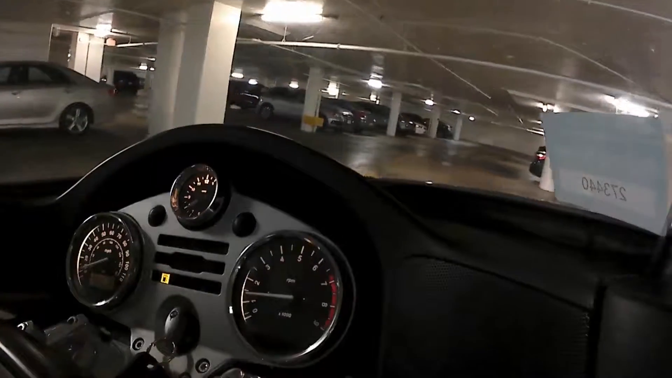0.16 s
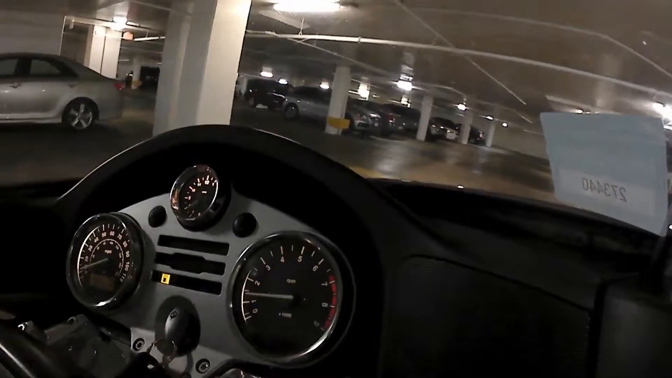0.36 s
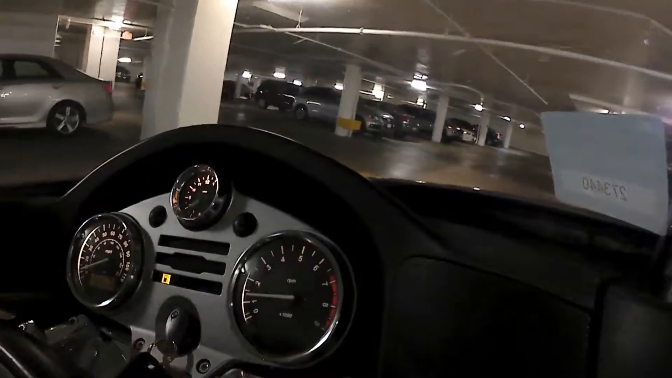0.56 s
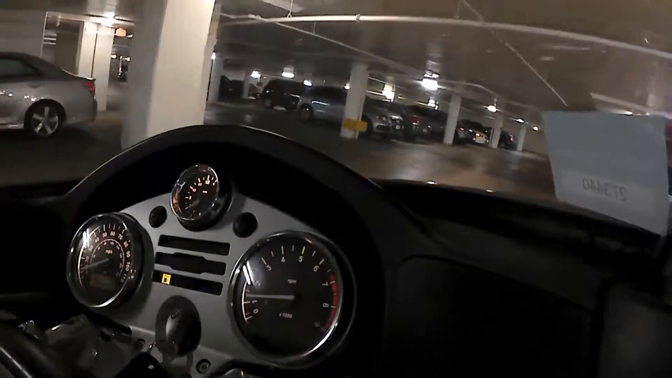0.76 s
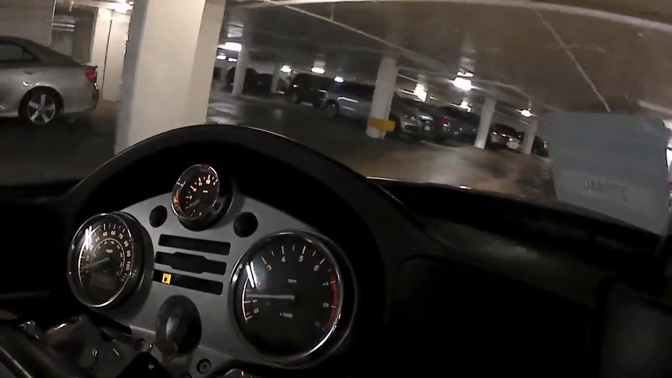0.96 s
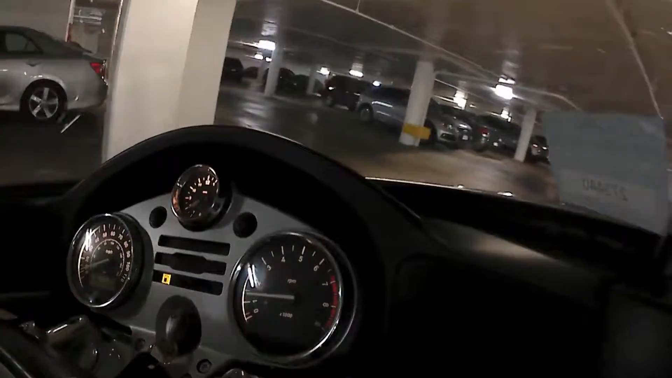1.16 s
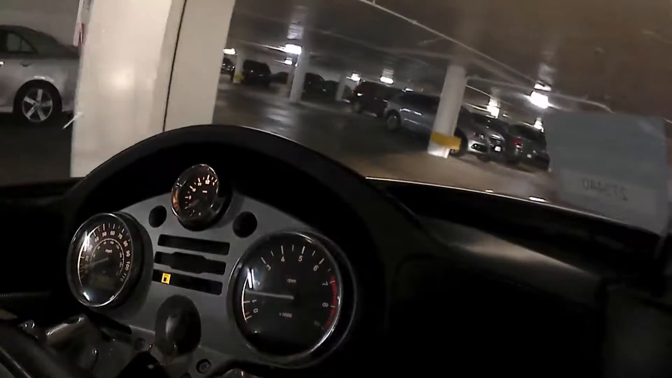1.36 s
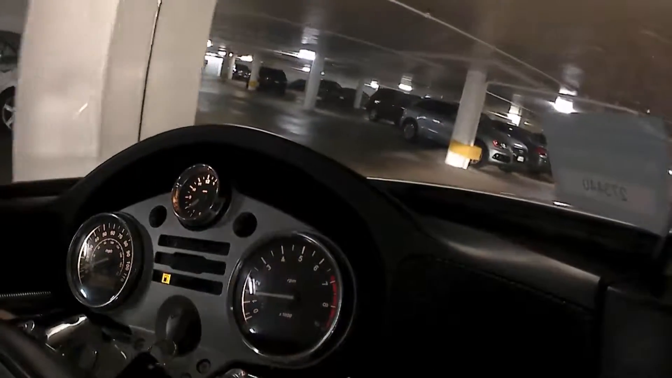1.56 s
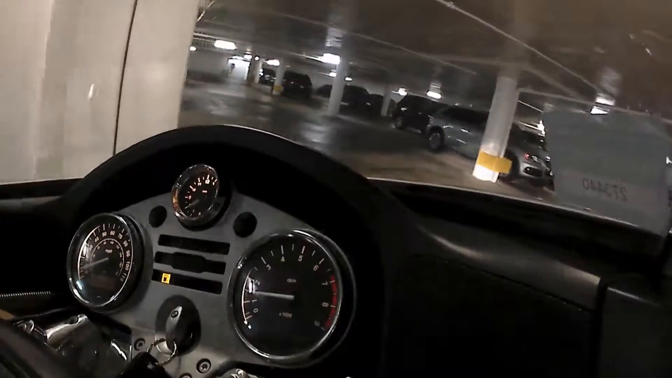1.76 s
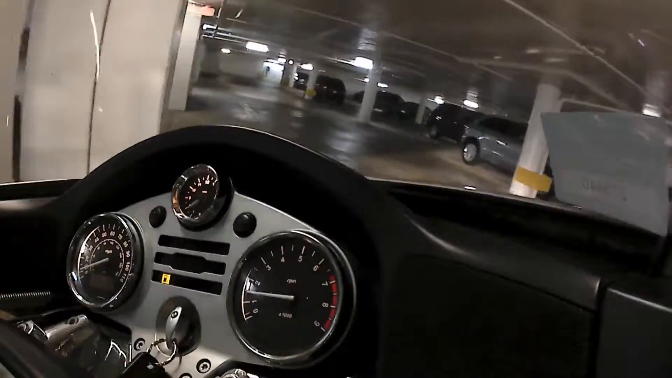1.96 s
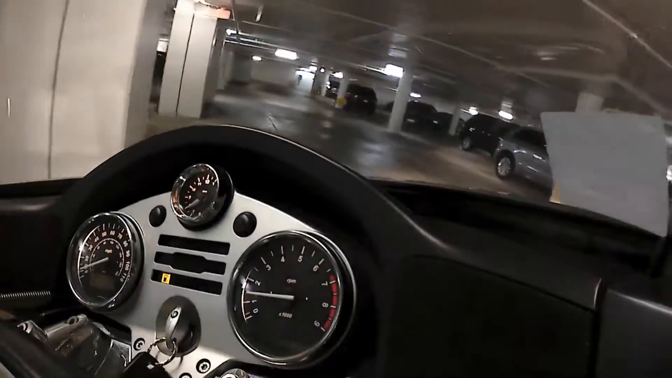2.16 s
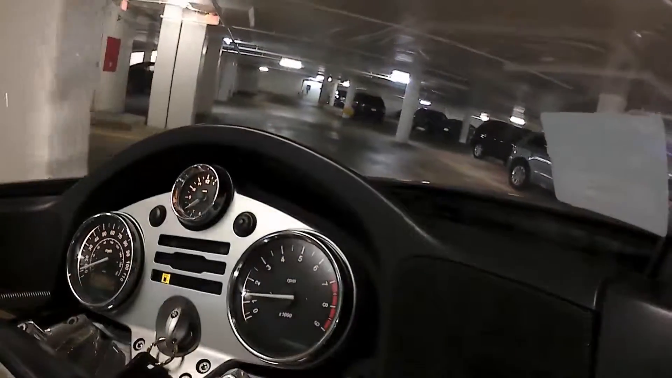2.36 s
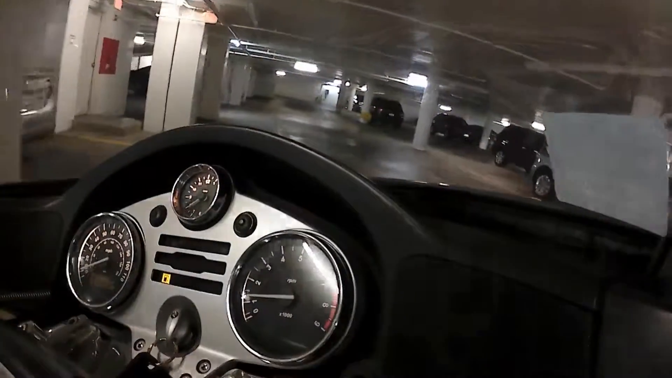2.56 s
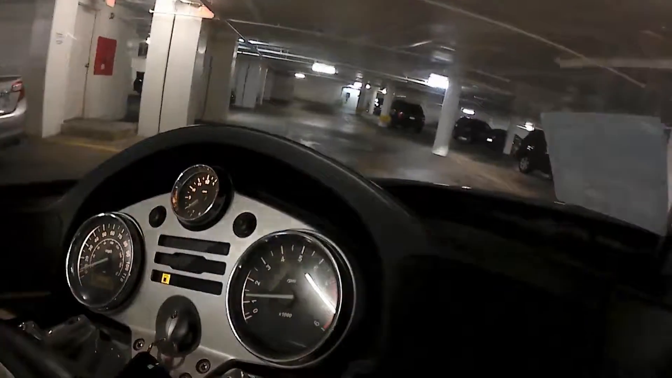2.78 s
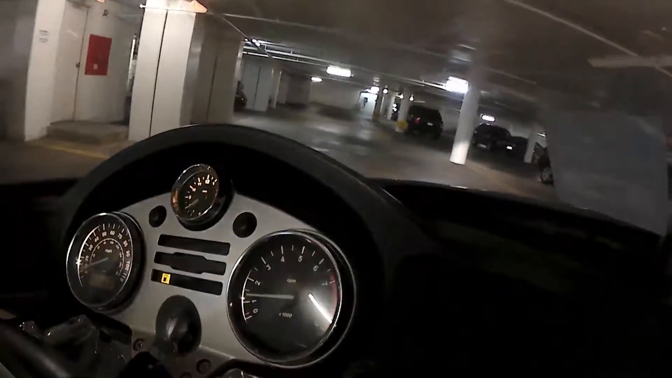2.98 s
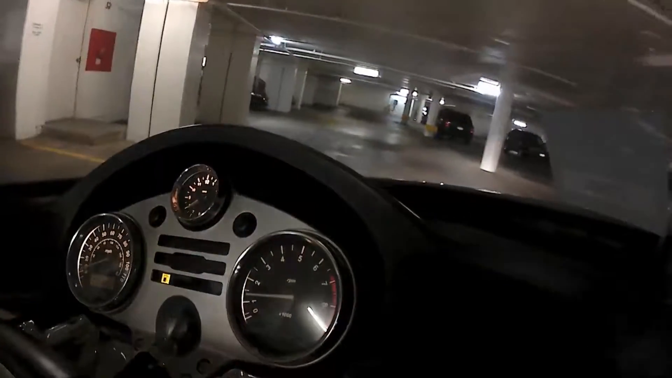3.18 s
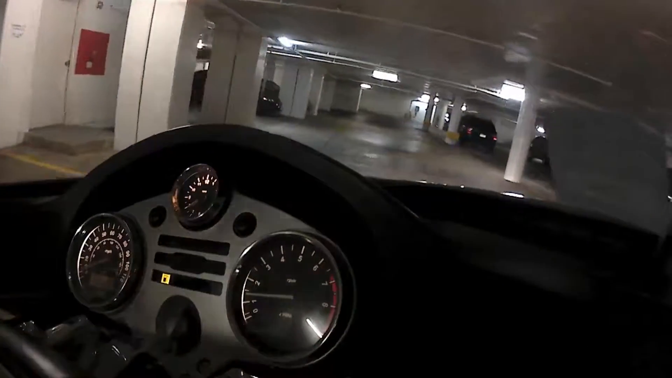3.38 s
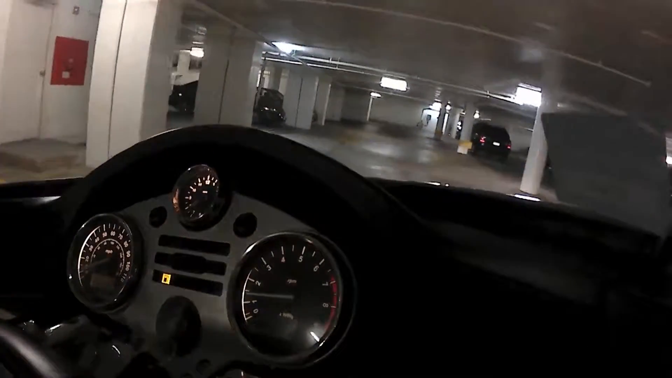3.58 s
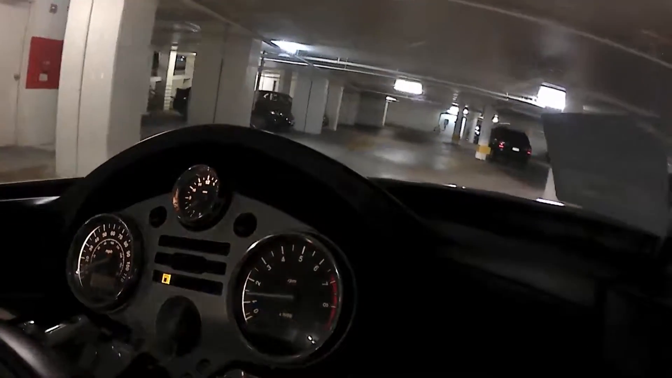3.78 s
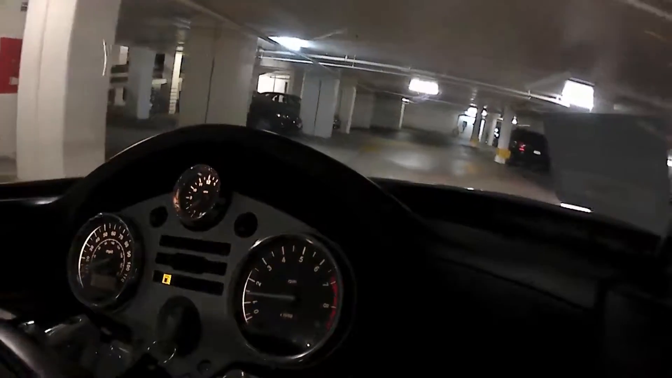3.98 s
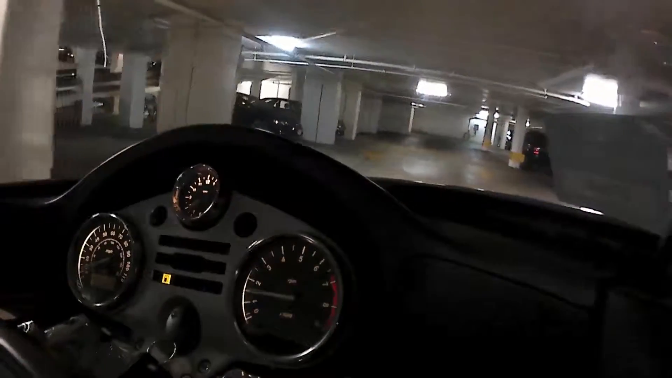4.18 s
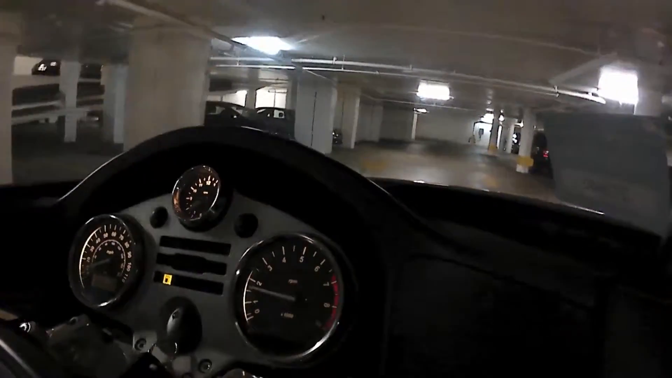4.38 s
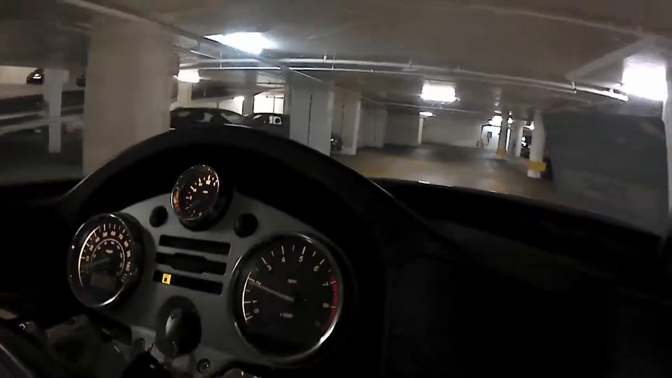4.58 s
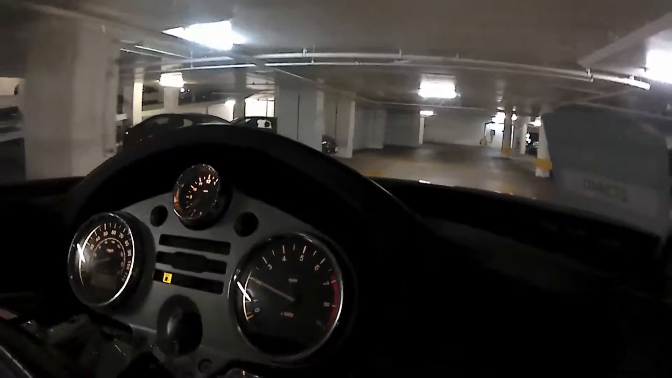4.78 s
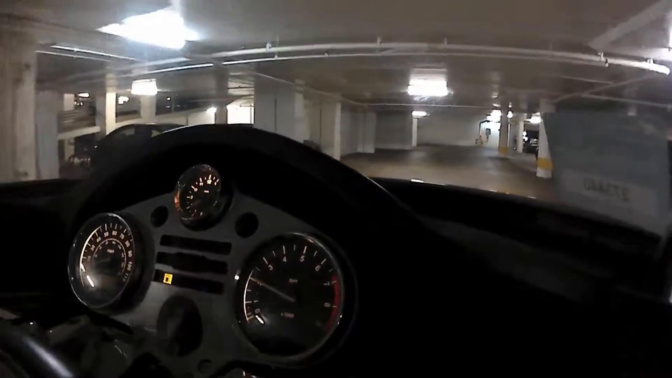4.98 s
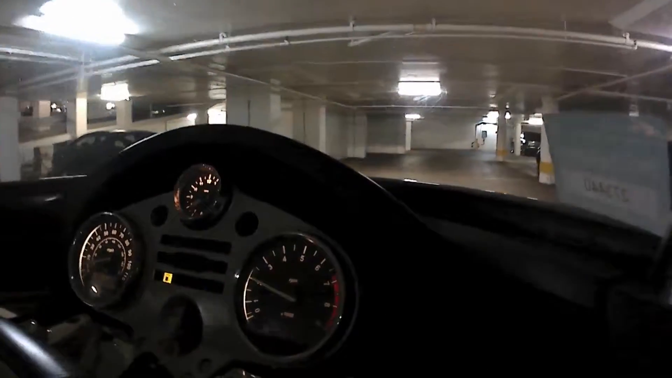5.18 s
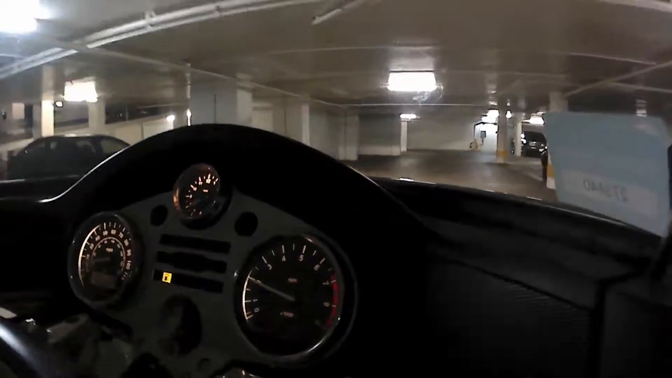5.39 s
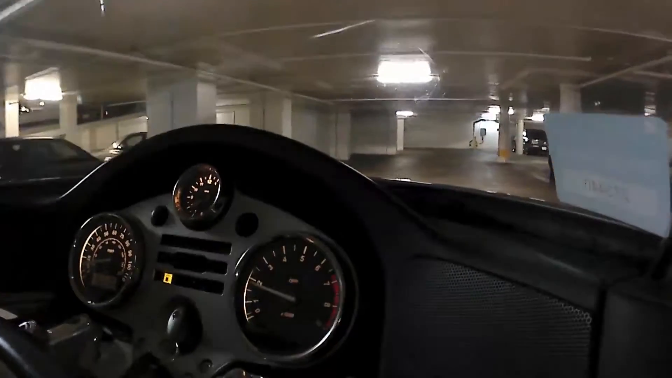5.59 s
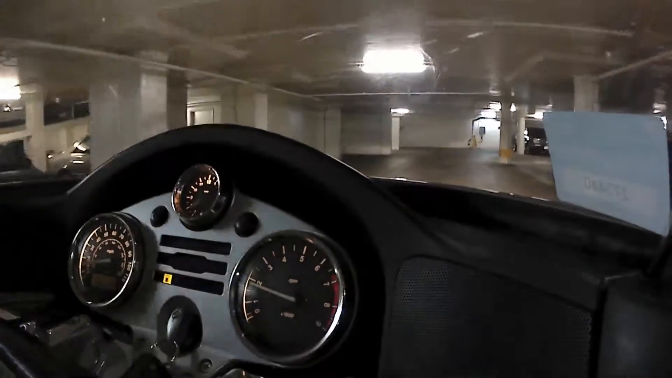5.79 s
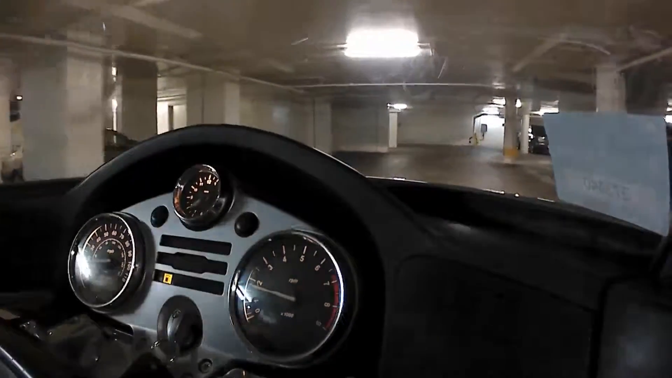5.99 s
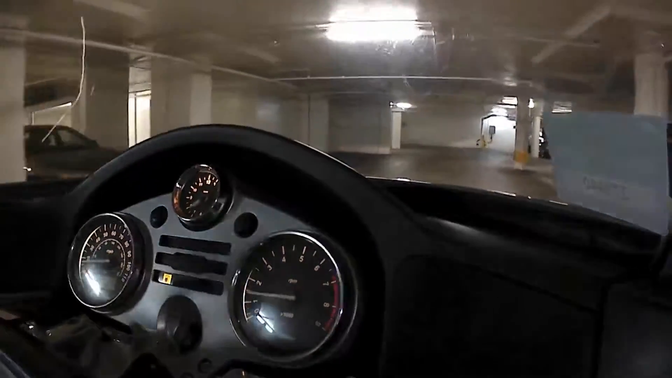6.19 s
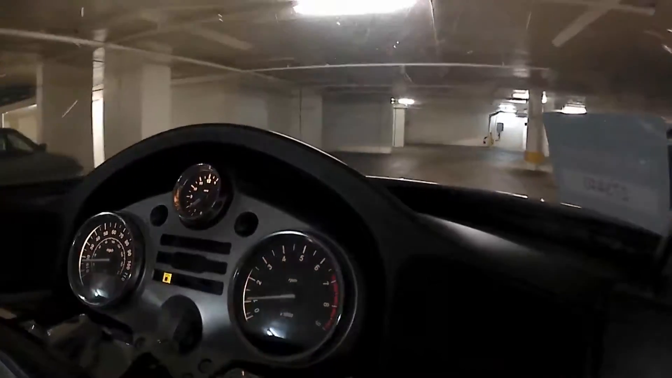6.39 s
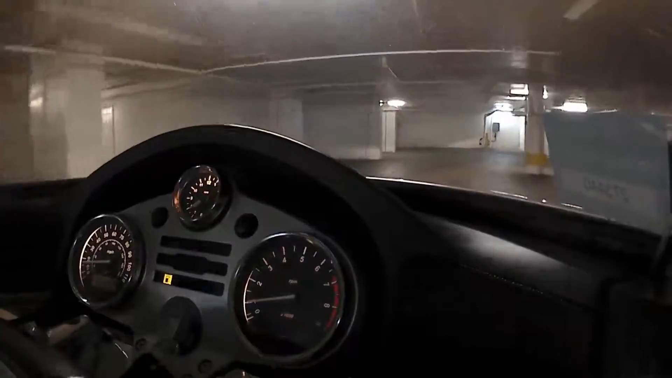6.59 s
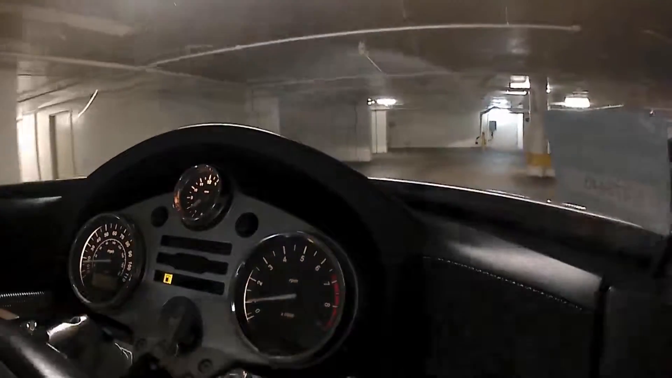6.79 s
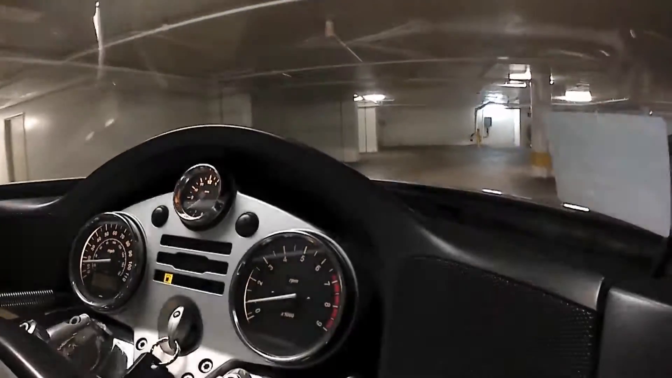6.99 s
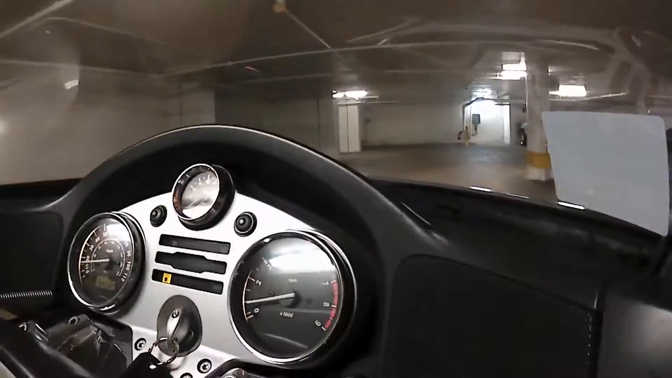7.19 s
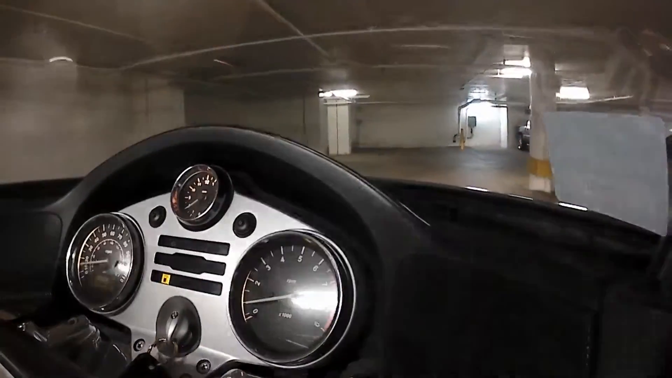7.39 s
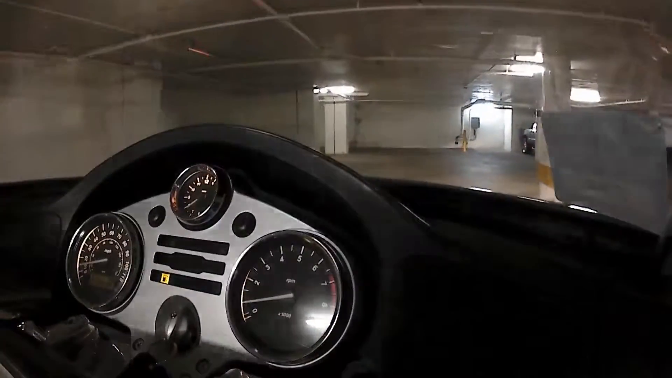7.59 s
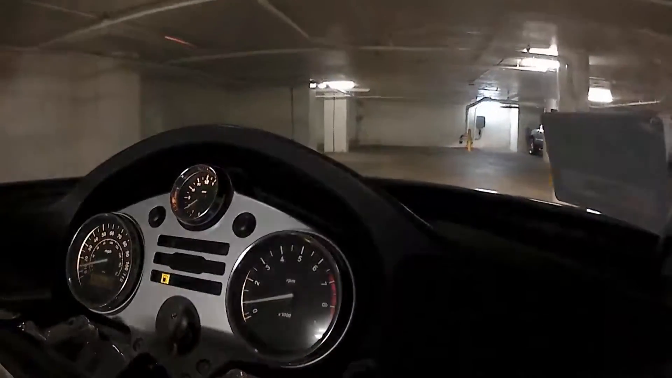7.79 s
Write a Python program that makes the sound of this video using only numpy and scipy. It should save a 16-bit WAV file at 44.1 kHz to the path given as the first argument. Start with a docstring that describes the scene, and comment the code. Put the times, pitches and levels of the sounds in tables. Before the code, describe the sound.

Close behind a motorcycle's windscreen, a twin engine thuds at low revs with a deep boom, while a loose panel knocks irregularly. After four seconds the revs climb quickly, the exhaust barks and the panel rattles hard, overloading the microphone. Then the throttle shuts, the driveline shudders and the engine settles into a slow idle with scattered knocks. Faint enclosed-garage reverberation.

```python
"""In a concrete garage a twin-cylinder motorcycle rolls along, heard at two microphone ports behind its windscreen.
The engine thuds once a turn, harder as it gathers speed; the air behind the fairing booms when the beat falls
in step with its resonance, and the pipe barks above idle over grainy clatter, a faint gear whine and hiss.
A loose panel knocks now and then and rattles on every turn, hardest while the revs are briefly up, when the loudest
sound overloads the microphone. Then the engine shudders down to idle and goes on shaking the panel."""
import sys
import numpy as np
from scipy import signal
from scipy.fft import rfft, irfft
from scipy.io import wavfile
from scipy.ndimage import uniform_filter1d

SR = 44100
rng = np.random.default_rng(int(sys.argv[2]) if len(sys.argv) > 2 else 0)


def wav_record(signal):
    """Record a signal, one row per channel, as 16-bit PCM in the file named by sys.argv[1]."""
    frames = np.transpose(np.atleast_2d(signal))
    bounded = np.clip(frames, -1, 1)
    # unit amplitude maps onto the largest positive 16-bit level
    quanta = np.round(bounded * 32767).astype(np.int16)
    wavfile.write(sys.argv[1], SR, quanta)


N = 346170
TIME = np.arange(N) / SR
BINS = np.fft.rfftfreq(N, 1 / SR)

# crank speed: time_s, speed_turns_per_s
CRANK_SPEED = [(0.0, 22.52), (0.3, 22.02), (0.51, 19.43), (0.7, 20.17), (0.89, 24.96), (1.79, 23.86),
               (2.28, 19.76), (2.61, 21.88), (3.66, 23.43), (3.87, 25.55), (4.31, 35.27), (4.57, 37.59),
               (5.44, 29.63), (5.52, 32.51), (6.04, 19.07), (6.16, 13.22), (6.46, 17.6), (6.87, 13.11),
               (7.04, 16.04), (7.85, 14.14)]
# single knocks of the loose panel, before each layer's trim: start_s, blow_db, edge_buzz_db
PANEL_KNOCKS = [(0.19, -5, -25), (0.209, -10, -34), (0.279, 0, -24), (0.298, -0.5, -19), (0.32, -4.5, -21),
                (0.369, 1, -21), (0.439, -5, -27), (0.463, -3, -26.5), (0.483, -9.5, -29.5),
                (0.529, -2, -20.5), (0.565, -3.5, -30), (0.631, -4, -26), (0.683, -7.5, -22),
                (0.731, -2.5, -17), (0.768, -6.5, -34), (0.847, -5.5, -32.5), (1.057, -1.5, -26),
                (1.075, -9.5, -32), (1.378, 0.5, -17.5), (1.542, -11.5, -33.5), (2.194, -13, -30.5),
                (2.491, -2.5, -26), (2.638, -5, -30.5), (2.658, -8.5, -27.5), (2.683, -3.5, -24),
                (2.782, -3, -21.5), (2.838, -8.5, -29.5), (2.876, -11, -31), (3.173, -6.5, -27.5),
                (3.192, -6, -27.5), (3.393, -2, -23), (3.447, -5.5, -18.5), (3.533, -5.5, -29),
                (3.773, -4, -31), (3.827, -1, -22.5), (3.878, -0.5, -21.5), (3.899, -0.5, -26),
                (3.975, -0.5, -21), (4.081, -3, -20), (4.205, 1.5, -11.5), (4.266, 2.5, -10.5),
                (4.298, -4, -12.5), (4.326, 2.5, -11.5), (4.383, -7, -15), (4.708, -3, -12.5),
                (4.762, -6, -11.5), (4.876, 0.5, -11), (5.499, 0, -9.5), (5.594, 2.5, -6.5),
                (5.77, -3.5, -29), (5.811, -2.5, -26), (5.83, -2, -21.5), (6.03, -8.5, -32),
                (6.074, -11, -27), (6.112, -2.5, -25.5), (6.154, -3.5, -23), (6.228, -4.5, -24),
                (6.257, -3, -30), (6.294, -4, -21.5), (6.359, 0, -16), (6.417, -5, -11), (6.479, 3.5, -13),
                (6.537, 0.5, -22), (6.598, -2, -24), (6.732, -0.5, -19.5), (6.873, -4, -22.5),
                (6.945, -6.5, -31.5), (7.011, -0.5, -22), (7.137, 6.5, -15), (7.203, -11, -28),
                (7.267, -7.5, -23.5), (7.533, -8.5, -39.5), (7.669, -5, -25)]

IDLE, REVVED = 13.9, 31.5  # crank speeds (turns per second)
STRIKE_TURN = 0.675  # crank angle after a firing at which the panel strikes (turns)
SHAKING_S = 4.1  # from here on the engine's shaking causes the knocks, before it the floor (s)
# time constants of the edge's buzz: brief after a jolt from the floor, longer when the engine shakes it (s)
JOLT_BUZZ_S, SHAKE_BUZZ_S = 0.00078, 0.0017


def amp(db):
    """Decibels to gain."""
    return 10 ** (np.asarray(db) / 20)


def unit(x):
    """Scales to rms 1."""
    return x / np.sqrt(np.mean(x ** 2) + 1e-20)


def curve(rows, t=TIME):
    """The columns of a time table, read at the times t."""
    s, *columns = np.transpose(rows)
    return [np.interp(t, s, c) for c in columns]


def spectrum(rows, hz):
    """The columns of a frequency table, read on a log axis."""
    f, *columns = np.transpose(rows)
    return [np.interp(np.log(hz + 1), np.log(f + 1), c) for c in columns]


def add(mix, s, sound):
    """Mixes a two-port sound in at time s."""
    part = mix[:, max(round(s * SR), 0):][:, :sound.shape[1]]
    part += sound[:, :part.shape[1]]


def causal(rows, size=8192):
    """The tightest (minimum-phase) impulse response that has this spectrum."""
    hz = abs(np.fft.fftfreq(size, 1 / SR))
    log_gain = np.log(amp(spectrum(rows, hz)[0]))
    return np.fft.ifft(np.exp(np.conj(signal.hilbert(log_gain)))).real[:size // 2]


def pipe(modes, lag):
    """The decaying ring of resonances after one kick and a short travel time."""
    hz, db, t60 = np.transpose(modes)[:, :, None]
    age = np.maximum(TIME[:SR // 2] - lag, 0)
    return (amp(db - 60 * age / t60) * np.sin(2 * np.pi * hz * age)).sum(0)


def play(fired, gains, response):
    """Sounds one response at every firing."""
    kicks = np.zeros(N + SR)  # one second of lead-in holds the firings before the start
    kicks[((fired + 1) * SR).astype(int)] = gains
    return signal.oaconvolve(kicks, response)[SR:SR + N]


def firings(count=8):
    """Crank angle in turns, and the times at which the two cylinders fire in turn; the engine is already running."""
    speed, = curve(CRANK_SPEED)
    turns = .25 + np.cumsum(speed) / SR
    fired = TIME[1:][np.diff(np.floor(turns)) > 0]
    earlier = fired[0] - np.arange(count, 0, -1) / speed[0]
    return turns, np.r_[earlier, fired]


def pull(db_per_change=4.5, limits_db=(-13, 0.5), smooth_s=0.17):
    """Firing strength in dB: harder as the crank gathers speed, softer as it slows."""
    change = np.gradient(np.log(curve(CRANK_SPEED)[0])) * SR  # relative change of speed per second
    return uniform_filter1d(np.clip(db_per_change * change, *limits_db), max(int(smooth_s * SR), 1))


def exhaust(fired, thud_db=-16.0, boom_db=-15.5, bark_db=-18.5, idle_scatter_db=2.5, thinning=-1.9,
            boom_hz=136.15, boom_t60=0.29, boom_lag=0.0031, bark_lag=0.0039,
            thud_share=0.59, bark_growth=0.97, bark_share=1.0):
    """Each firing kicks a thud, the air behind the fairing and, above idle, the pipe; speed evens the kicks out."""
    # spectrum of one exhaust thud: frequency_hz, gain_db
    thud_colour = [(5, -44.5), (24, -4), (45, 9.5), (64, 9.5), (84, 11.5), (108, 11), (150, -11),
                   (220, -11.5), (330, -13), (500, -37.5), (1200, -70)]
    # fairing boom beyond what the beat gives it: time_s, relative_level_db
    boom_level = [(0.0, 2.5), (0.3, 7), (1.2, 2), (2.0, 0.5), (3.0, 0), (3.35, 4.5), (3.65, -3.5),
                  (4.6, 2.5), (6.05, -4), (6.4, 2), (7.85, 0)]
    # pipe resonances that bark under load: frequency_hz, gain_db, t60_s
    bark_modes = [(114, -1, 0.21), (158.4, 4, 0.086), (185, 3.5, 0.098), (253.4, -7, 0.13),
                  (264.7, -7.5, 0.24)]
    speed = curve(CRANK_SPEED, fired)[0]
    strength = np.interp(fired, TIME, pull())
    kicks = amp(idle_scatter_db * IDLE / speed * rng.standard_normal(len(fired)))
    # thud and boom thin out at high revs
    low_kicks = kicks * np.maximum(speed / REVVED, 1) ** thinning
    thud = -play(fired, low_kicks * amp(thud_share * strength), causal(thud_colour))
    boom = play(fired, low_kicks * amp(strength), pipe([(boom_hz, 0, boom_t60)], boom_lag))
    boom = amp(curve(boom_level)[0]) * boom
    bark_kicks = kicks * amp(bark_share * strength) * np.maximum(speed - IDLE, 0) ** bark_growth
    bark = play(fired, bark_kicks, pipe(bark_modes, bark_lag))
    return amp(thud_db) * unit(thud) + amp(boom_db) * unit(boom) + amp(bark_db) * unit(bark)


def rocking(turns, top_db=-11.5, growth=3.2):
    """The unbalanced crank rocks the frame once a turn, steeply more with speed."""
    speed, = curve(CRANK_SPEED)
    return amp(top_db) * (speed / speed.max()) ** growth * np.sin(2 * np.pi * (turns - .25))


def mechanics(turns, trim_db=1.5, beat_db=0.5, chug_db=2, grain_db=3.0, apart=0.25, bright_db=0.31):
    """Valve gear and intake: grainy noise that chugs once a turn, flutters twice and brightens with effort."""
    # mechanical noise before its trim: time_s, level_db
    clatter_level = [(0.0, -25), (0.45, -22.5), (0.9, -23.5), (2.0, -25.5), (3.6, -21), (4.3, -15.5),
                     (5.3, -12.5), (5.62, -15), (5.95, -25), (6.35, -23), (7.85, -29.5)]
    # its spectrum: frequency_hz, density_db_per_hz
    clatter_colour = [(60, 10), (220, 6), (340, 0), (480, -3), (740, 4.5), (1150, -4), (1600, -12),
                      (2400, -17), (3000, -25.5), (5000, -33), (7100, -30.5), (9000, -35.5), (12000, -51),
                      (15500, -48)]
    level, = curve(clatter_level)
    noise = rng.standard_normal((3, N))  # one shared by both ports, then one for each
    grain = unit(uniform_filter1d(rng.standard_normal(N), 130))
    flutter = beat_db * np.cos(4 * np.pi * turns)
    chug = chug_db * np.cos(2 * np.pi * (turns - STRIKE_TURN))
    drive = (noise[0] + apart * noise[1:]) * amp(flutter + chug + grain_db * grain)
    dull = unit(irfft(rfft(drive) * amp(spectrum(clatter_colour, BINS)[0]), N))
    treble = signal.sosfilt(signal.butter(1, 2500, "high", fs=SR, output="sos"), dull)
    # bright_db: treble lift per dB of level above the quietest moment
    lift = amp(bright_db * (level - level.min())) - 1
    return amp(level + trim_db) * (dull + treble * lift)


def gears(wander=1.504):
    """The final drive's teeth whine faintly, sinking in pitch with lost pace, clearest as the throttle shuts."""
    # whine: time_s, pitch_hz, level_db
    whine_course = [(1.6, 1255, -39), (2.2, 1065, -36.5), (5.3, 1000, -37), (5.9, 880, -29.5),
                    (6.2, 850, -32.5), (7.85, 800, -37)]
    hz, level = curve(whine_course)
    drift = np.cumsum(rng.standard_normal(N)) / np.sqrt(SR)  # random walk of the phase
    turns = np.cumsum(hz) / SR + wander * drift
    return amp(level) * np.sqrt(2) * np.sin(2 * np.pi * turns)


def hiss(level_db=-51.0):
    """A faint steady hiss, different at each port."""
    # frequency_hz, density_db_per_hz
    hiss_colour = [(2000, 12.5), (4000, -25), (5500, -29), (7000, 16), (7900, -39), (9200, 10),
                   (11000, -45), (15500, -25)]
    noise = rfft(rng.standard_normal((2, N)))
    return amp(level_db) * unit(irfft(noise * amp(spectrum(hiss_colour, BINS)[0]), N))


def knock(clack, blow_db, buzz_db, buzz_s, band_hz=(560, 1150), detune=0.042, grain_db=3, apart=0.43,
          vary=0.14, order=4):
    """A blunt blow rings the panel's modes; its edge clacks dryly on the frame in a burst of tiny contacts."""
    # ringing of the panel, before the blow's filter: frequency_hz, gain_db, t60_s
    panel_modes = [(680, 10.5, 0.038), (777, 15.5, 0.028), (1007, 3.5, 0.03), (1362, 2, 0.018),
                   (2510, 4, 0.013)]
    t = TIME[:1500]
    hz, db, t60 = np.transpose(panel_modes)[:, :, None]
    hz = hz * (1 + detune * rng.standard_normal(hz.shape))  # it never lands quite the same way
    ring = (amp(db - 60 * t / t60) * np.sin(2 * np.pi * hz * t)).sum(0)
    blow = signal.lfilter(*signal.butter(2, band_hz, "band", fs=SR), ring)
    noise = rng.standard_normal((4, len(t)))
    swell = (t / buzz_s) ** 2 * np.exp(-t / buzz_s)
    contacts = (noise[0] + apart * noise[2:]) * amp(grain_db * noise[1]) * swell
    spot = np.r_[1, vary * rng.standard_normal(order)]  # each point of contact has its own colour
    colour = np.convolve(clack, spot)
    colour = colour / np.linalg.norm(colour)
    buzz = signal.fftconvolve(unit(contacts), colour[None], axes=1)[:, :len(t)]
    return amp(blow_db) * blow / abs(blow).max() + amp(buzz_db) * buzz


def panel(fired, clack, scatter_db=1.0, shake_buzz_db=-11.0, buzz_growth=1.0, hard_hz=(850, 1650),
          rebound_db=-13, rebound_s=0.014):
    """The panel strikes once a turn, harder for one cylinder, and rebounds once; near a single knock it skips."""
    # shaking by the engine, each spell lasting until the next starts (its ramp may be cut off or absent):
    # start_s, ramp_reference_s, first_blow_db, last_blow_db, lead_db (given to one cylinder, taken from the other)
    shake_spells = [(0.0, 3.7, -29.5, -21, -3), (3.7, 3.17, -12.5, -11.5, 3.5), (4.22, 8.4, -6.5, 1, 2.5),
                    (4.98, 5.07, 0.5, -2.5, 1.7), (5.64, 7.85, -19.5, -28.5, -1.5)]
    out = np.zeros((2, N))
    knocked = np.transpose(PANEL_KNOCKS)[0]
    for k, period in enumerate(np.diff(fired)):
        s = fired[k] + STRIKE_TURN * period
        if s < 0 or abs(knocked - s).min() <= .01:
            continue
        start, reference, first, last, lead = [spell for spell in shake_spells if spell[0] <= s][-1]
        shake = np.interp(s, [start, reference], [first, last])
        blow = shake + lead * (-1) ** k + scatter_db * rng.standard_normal()
        buzz = blow + buzz_growth * shake + shake_buzz_db
        rebound = s + rebound_s * rng.uniform(.5, 1)
        for when, gain in (s, 1), (rebound, amp(rebound_db)):
            add(out, when, gain * knock(clack, blow, buzz, SHAKE_BUZZ_S, hard_hz))
    return out


def bumps(clack, blow_db=-1, buzz_db=-2.5, bounce_db=-12, lurch_hz=(560, 1700)):
    """Single knocks of the panel: jolts from the floor, then harder lurches of the engine, which make it bounce."""
    out = np.zeros((2, N))
    delays = rng.uniform(0.0056, .018, len(PANEL_KNOCKS))  # from lurch to bounce (s)
    for (s, blow, buzz), delay in zip(PANEL_KNOCKS, delays):
        levels = blow + blow_db, buzz + buzz_db
        if s < SHAKING_S:
            add(out, s, knock(clack, *levels, JOLT_BUZZ_S))
        else:
            for when, gain in (s, 1), (s + delay, amp(bounce_db)):
                add(out, when, gain * knock(clack, *levels, SHAKE_BUZZ_S, lurch_hz))
    return out


def ticks(clack, blow_db=-13, buzz_db=-16, spread_db=2, settle_s=.08, count=2):
    """After each jolt from the floor the panel ticks lightly at random until it settles."""
    out = np.zeros((2, N))
    for s, blow, buzz in [row for row in PANEL_KNOCKS if row[0] < SHAKING_S]:
        waits = settle_s * rng.random(count)
        forces = spread_db * rng.standard_normal(count)
        for wait, force in zip(waits, forces):
            add(out, s + wait, knock(clack, blow + blow_db + force, buzz + buzz_db + force, JOLT_BUZZ_S))
    return out


def echoes(x, decay):
    """A diffuse tail for each port; every band dies at its own speed."""
    noise = rng.standard_normal((2, SR)) * (TIME[:SR] > .004)  # nothing returns in the first 4 ms
    hz, t, z = signal.stft(noise, SR, nperseg=256)
    t60 = spectrum(decay, hz)[0][:, None]
    tail = signal.istft(z * amp(-60 * t / t60), SR, nperseg=256)[1]
    return signal.fftconvolve(x[None], tail / np.linalg.norm(tail[0]), axes=1)[:, :N]


def shudder(turns, start=5.66, length=0.31, level_db=-15.5, uneven=1.0):
    """As the throttle shuts, the drive line shudders unevenly at about twice the crank speed."""
    swell = np.sin(np.pi * np.clip((TIME - start) / length, 0, 1))
    lurch = unit(signal.lfilter(*signal.butter(2, 22, fs=SR), rng.standard_normal((2, N))))
    angle = 4 * np.pi * turns
    shake = (1 + uneven * lurch[0]) * np.sin(angle) + uneven * lurch[1] * np.cos(angle)
    return amp(level_db) * swell * shake / np.hypot(1, uneven)


def scene(cockpit_db=-17, cockpit_t60=0.16, garage_db=-29):
    """Engine and panel, the panel's short cockpit reflections and a faint garage tail, at the two ports."""
    # dry clack of the panel's edge on the frame, with the microphone's own colour above 6 kHz (peaks near 7.2
    # and 8.8 kHz, a dip at 8 kHz): frequency_hz, density_db_per_hz
    clack_colour = [(400, -16.5), (950, 14), (1400, 5.5), (1600, -4.5), (1800, 4), (2050, -7), (2450, 7.5),
                    (2750, -5), (3400, 2.5), (4000, -10), (4400, -2.5), (6400, -20.5), (7200, -10.5),
                    (8000, -33), (8800, -14), (9700, -24.5), (15000, -25.5)]
    # reverberation of the garage: frequency_hz, t60_s
    garage_decay = [(100, 5.1), (800, 0.15), (3000, 0.25), (10000, 0.011)]
    # the two microphone ports: frequency_hz, left_minus_right_db, left_lead_rad
    port_differences = [(60, -4.5, 0.0057), (150, -5.5, 0.017), (380, -1.8, 0.29), (696, 0.5, 0.76),
                        (1400, 5, 0.59), (2380, 7.5, 0.64), (4400, 10, 0.7), (8100, 9, 0.15),
                        (15000, -1, 0.06)]
    turns, fired = firings()
    engine = exhaust(fired) + rocking(turns) + shudder(turns) + gears()
    noise = mechanics(turns) + hiss()
    clack = causal(clack_colour, size=2048)
    rattle = panel(fired, clack) + bumps(clack) + ticks(clack)
    near = engine + rattle
    cockpit = echoes(rattle.mean(0), [(500, cockpit_t60), (8000, cockpit_t60 / 2)])
    garage = echoes(near.mean(0), garage_decay)[0]  # the same tail reaches both ports
    air = near + noise + amp(cockpit_db) * cockpit + amp(garage_db) * garage
    balance_db, lead = spectrum(port_differences, BINS)
    left = amp(balance_db / 2) * np.exp(.5j * lead)
    ports = np.array([left, 1 / left])
    return irfft(rfft(air) * ports / abs(ports.mean(0)), N)


def record(dry, top_hz=13000, edge_hz=15700, dip_hz=8000, dip_q=6, dip_depth=.7):
    """No steady pressure gets in, loud peaks overload with a tight knee; the treble is dull, dips narrowly, then ends."""
    sound = signal.lfilter(*signal.butter(1, 5, "high", fs=SR), dry)
    clipped = sound / (1 + sound ** 16) ** (1 / 16)
    dulled = signal.lfilter(*signal.butter(1, min(top_hz, SR / 2 - 1), fs=SR), clipped)
    hollow = signal.lfilter(*signal.iirnotch(dip_hz, dip_q, fs=SR), dulled)
    dipped = (1 - dip_depth) * dulled + dip_depth * hollow
    band_limit = signal.firwin(511, edge_hz, window=("kaiser", 9), fs=SR)
    return signal.oaconvolve(dipped, band_limit[None], "same")


dry = scene()
out = record(dry)
wav_record(out)
```